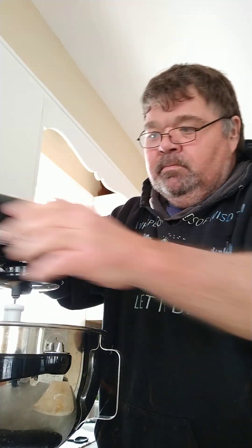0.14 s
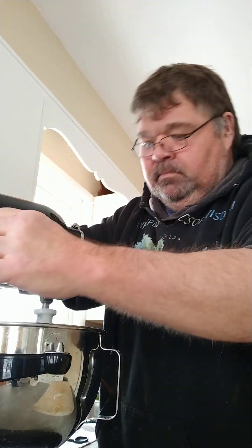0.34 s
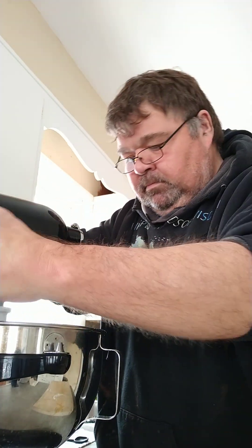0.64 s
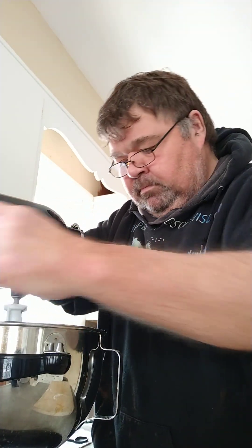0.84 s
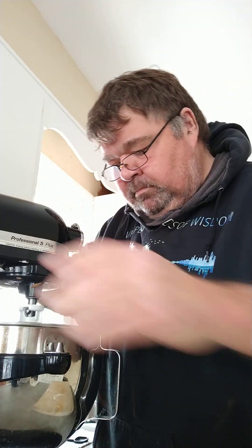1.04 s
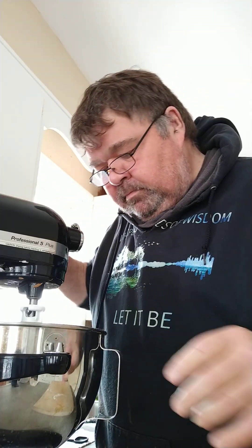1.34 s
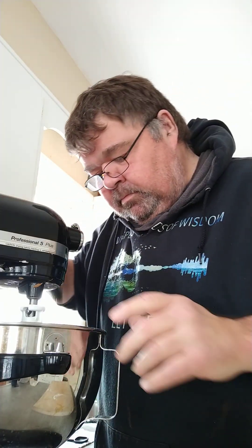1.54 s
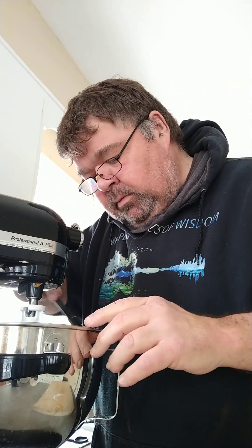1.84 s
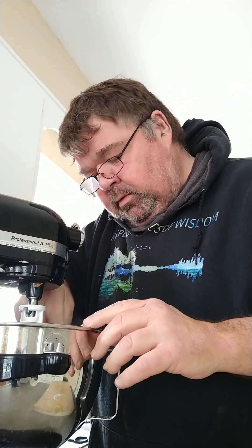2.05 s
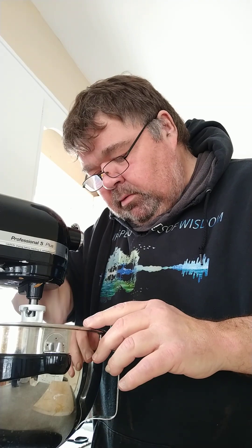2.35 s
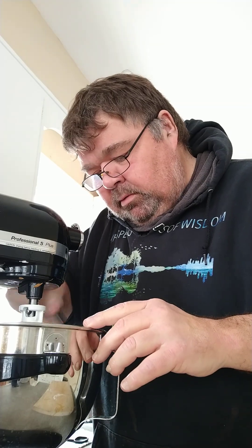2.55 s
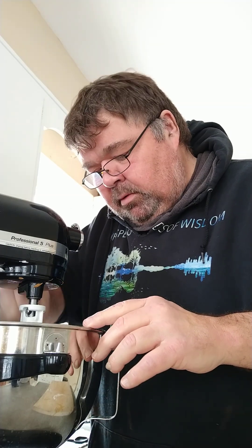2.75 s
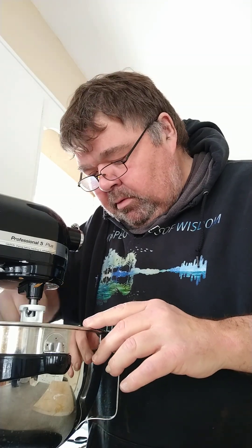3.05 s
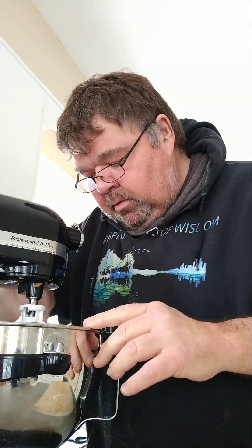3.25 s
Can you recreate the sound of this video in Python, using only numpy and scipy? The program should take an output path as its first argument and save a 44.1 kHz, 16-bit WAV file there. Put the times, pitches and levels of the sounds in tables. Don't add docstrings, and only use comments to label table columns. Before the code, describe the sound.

A stand mixer runs close by, its wavering mid-pitched gear whine mixed with high squeal, motor hum, brush hiss and low dough thuds. At 0.7 s a sharp switch snap cuts power; the whine slides down and dies by about 1.1 s, the noise by 1.3 s. Quiet room air and faint fridge hum remain, with a soft knock at 1.9 s, light hand rubs from 2.0 s, and small steel bowl taps from 2.8 to 3.35 s.

```python
import sys
import numpy as np
from scipy import signal
from scipy.fft import rfft, irfft, next_fast_len
from scipy.io import wavfile
from scipy.ndimage import uniform_filter1d

SR = 44100
rng = np.random.default_rng(int(sys.argv[2]) if len(sys.argv) > 2 else 0)


def voltage_ratio(decibels):
    exponent = np.asarray(decibels, float) / 20
    return 10 ** exponent


def to_wav(s):
    ch = np.atleast_2d(s).T
    pcm = np.round(np.clip(ch, -1, 1) * 32767)
    wavfile.write(sys.argv[1], SR, pcm.astype(np.int16))


N = 149940
TIME_S = np.arange(N) / SR
BIN_HZ = np.arange(N // 2 + 1) * SR / N
OFF_S = 0.7035


def rms_one(x):
    return x / np.sqrt(np.mean(x ** 2) + 1e-20)


def in_time(rows):
    s, *columns = np.transpose(rows)
    return [np.interp(TIME_S, s, column) for column in columns]


def at_hz(points, hz):
    point_hz, value = np.array(points).T
    return np.interp(np.log(hz + 1), np.log(point_hz), value)


def drift(rate_hz):
    r = np.exp(-40 * np.pi * rate_hz / SR)
    slow = signal.lfilter([1], [1, -2 * r, r * r], rng.standard_normal(N // 20 + 2002))[2000:]
    return np.interp(np.arange(N) / 20, np.arange(len(slow)), rms_one(slow))


def sine(hz):
    return np.sqrt(2) * np.sin(2 * np.pi * np.cumsum(hz + np.zeros(N)) / SR)


def ring(clicks, hz, t60):
    r, w = voltage_ratio(-60 / (t60 * SR)), 2 * np.pi * hz / SR
    return signal.lfilter([0, np.sin(w)], [1, -2 * r * np.cos(w), r * r], clicks + 1e-18)


# pitch_hz, likeness [0 to 1]
LIKENESS = [(200, 0.99), (500, 0.97), (1200, 0), (15000, 0.15)]
# pitch_hz, left_minus_right_db
NEAR_SIDE = [(60, -7), (150, 0.5), (380, -5.5), (950, -6), (2380, 1.5), (5980, -1.5), (15000, -19)]
FAR_SIDE = [(60, 4), (380, -4), (2380, 0.5), (15000, -7.5)]


def ports(x, side, diffuse=None, lagged=True):
    lag_s = 0.00014 * lagged
    half = voltage_ratio(at_hz(side, BIN_HZ) / 2) * np.exp(-1j * np.pi * BIN_HZ * lag_s)
    shared, unlike = rfft(x), 0
    if diffuse is not None:
        alike = np.clip(at_hz(LIKENESS, BIN_HZ), 0, 1)
        shared = np.sqrt(1 + alike) * shared
        unlike = np.sqrt(1 - alike) * rfft(diffuse)
    out = irfft([(shared + unlike) * half, (shared - unlike) / half], N)
    return out / np.sqrt(np.mean(out.mean(0) ** 2) / np.mean(x ** 2))


def noise(spectrum, side):
    inside = (BIN_HZ > spectrum[0][0]) * (BIN_HZ < spectrum[-1][0])
    shape = voltage_ratio(at_hz(spectrum, BIN_HZ)) * inside
    mid, other = irfft(shape * rfft(rng.standard_normal((2, N))), N)
    return ports(mid, side, other) / np.std(mid)


def band(hz, width_hz):
    sos = signal.butter(2, [hz - width_hz / 2, hz + width_hz / 2], "band", fs=SR, output="sos")
    return rms_one(signal.sosfilt(sos, rng.standard_normal(N)))


def stroke(start, rise, hold, fall, db):
    corners_s = np.cumsum([start, rise, hold, fall])
    return voltage_ratio(np.interp(TIME_S, corners_s, [db - 14, db, db, db - 33], left=-150, right=-150))


# time_s, pitch_hz, level_db, second_partial_db
MESH = [(0, 942, -37.5, -41), (.02, 959.5, -27.5, -50), (.09, 947.4, -40, -42.5), (.135, 991.4, -26, -40.5),
        (.165, 968, -33.5, -44), (.216, 984, -30, -40.5), (.262, 949, -30.5, -40.5),
        (.3, 976.6, -37, -43.5), (.385, 944, -29.5, -41), (.43, 900, -27.5, -39),
        (.47, 906.6, -28.5, -47.5), (.5, 905, -34.5, -37.5), (.53, 906.1, -27.5, -40),
        (.585, 897.7, -31, -33), (.606, 880, -39.5, -39), (.63, 882, -23, -34.5), (.658, 905, -41, -42.5),
        (.685, 914.7, -38.5, -33.5)]
COAST = [(.72, 931.4, -31.5, -36), (.746, 893.6, -30.5, -44.5), (.795, 788, -28.5, -42),
         (.843, 668, -32, -34.5), (.87, 652.7, -31.5, -47.5), (.896, 596.2, -32, -49),
         (.922, 556.4, -23.5, -41.5), (.946, 521.2, -41, -40.5), (1.004, 426.7, -30, -45),
         (1.033, 389, -37, -50.5), (1.06, 314.2, -57.5, -48.5), (1.11, 290.2, -59.5, -44.5)]


def gear_whine(mesh_turn):
    _, db, second_db = in_time(MESH + COAST)
    shaft_turn = mesh_turn / 9.3
    wobble = 2 * voltage_ratio(-15 + 2.6 * drift(9.2)) * np.cos(shaft_turn + 0.8 * drift(22))
    rough = 1 + voltage_ratio(-11.5) * drift(90) + wobble
    flutter_db = 2.15
    first = voltage_ratio(db + flutter_db * drift(17)) * np.sin(mesh_turn)
    upper = np.sin(2 * mesh_turn) + voltage_ratio(-17.5) * np.sin(3 * mesh_turn)
    return np.sqrt(2) * rough * (first + voltage_ratio(second_db + flutter_db * drift(30)) * upper)


# time_s, level_db
SQUEAL = [(0, -52), (.07, -41), (.13, -41.5), (.21, -38), (.26, -41), (.33, -42.5), (.39, -45),
          (.43, -38.5), (.5, -40), (.58, -40.5), (.62, -46.5), (.68, -39.5), (.73, -32.5), (.8, -47),
          (.86, -47.5), (.95, -55.5), (1.05, -69.5)]
# pitch_hz, level_db
SQUEAL_BODY = [(7300, -29), (8300, -17.5), (9500, -13), (10750, -6), (11650, 2), (12500, -7),
               (13300, -28.5)]


def housing_squeal(mesh_hz):
    off = TIME_S > OFF_S
    jitter = np.where(off, 0.04, 0.0055)
    shaky_hz = mesh_hz * (1 + jitter * drift(160))
    partials = 0
    for k in range(9, 19):
        hz = k * mesh_hz
        dulling_db = off * -22 * np.log2(hz / 9800)
        level_db = at_hz(SQUEAL_BODY, hz) + dulling_db + 3 * drift(48)
        partials = partials + voltage_ratio(level_db) * sine(k * shaky_hz)
    return voltage_ratio(in_time(SQUEAL)[0]) * partials


# pitch_hz, level_db
MOTOR_HUM = [(183.0, -52.5), (242.2, -50), (290.7, -48), (360.7, -42.5), (414.5, -46.5)]


def motor_hum():
    hum = 0
    for hz, db in MOTOR_HUM:
        wave = np.sin(2 * np.pi * hz * TIME_S + 0.87 * drift(16))
        hum = hum + np.sqrt(2) * voltage_ratio(db + 2.5 * drift(37)) * wave
    return hum * np.exp(-np.maximum(TIME_S - OFF_S, 0) / 0.045)


# pitch_hz, width_hz, level_db
CASE = [(554, 31, -48), (857, 43, -44), (1415, 60, -50), (1610, 40, -50), (2051, 60, -52.5),
        (5610, 200, -54.5)]


def housing_resonance(swing_db, power):
    total = 0
    for hz, width_hz, db in CASE:
        loss_db = 9 * (1 - power) * (hz < 1000)
        total = total + voltage_ratio(db - loss_db) * band(hz, width_hz)
    return voltage_ratio(0.6 * swing_db) * total


RUMBLE = [(24, -42.5), (40, -14.5), (200, -9.5), (354, -6.5), (683, -10), (916, -10), (2500, -22.5),
          (3250, -55.5), (5500, -120)]
GRIND = [(900, -3.5), (1600, -1.5), (2500, -2.5), (3300, -8), (4500, -5), (5800, -4.5), (7300, -14.5),
         (8000, -14)]
HISS = [(7300, -14.5), (8200, -0.5), (10500, 3.5), (13000, 0), (16000, -20.5)]
HISS_SLOW = [(7300, -5.5), (8200, 7.5), (9700, 5), (11800, -3), (13000, -8.5), (16000, -23.5)]


def motor_noise(effort_db, swing_db, power, mesh_turn):
    tooth_pulse = 1 + 0.069 * np.cos(mesh_turn)
    rumble_db = effort_db[0] + 7.5 + 0.5 * swing_db - 10.5 * (1.5 - power) + 2.8 * drift(11)
    grind_db = effort_db + 1.1 * drift(45)
    hiss_db = effort_db[0] + 1 + 2.12 * swing_db + 2 * (1 - power) + 1.2 * drift(26)
    fast = power * noise(HISS, NEAR_SIDE)
    slow = (1 - power) * voltage_ratio(5.5) * noise(HISS_SLOW, NEAR_SIDE)
    rumble = voltage_ratio(rumble_db) * noise(RUMBLE, NEAR_SIDE)
    grind = voltage_ratio(grind_db) * tooth_pulse * noise(GRIND, NEAR_SIDE)
    return rumble + grind + voltage_ratio(hiss_db) * tooth_pulse * (fast + slow)


# time_s, level_db
EFFORT = [(0, -40), (.69, -41.5), (.73, -38.5), (.9, -43), (1.0, -46), (1.08, -49.5), (1.2, -59),
          (1.26, -76)]


def motor():
    mesh_hz = in_time(MESH + COAST)[0]
    mesh_turn = 2 * np.pi * np.cumsum(mesh_hz * (1 + 0.005 * drift(36.2))) / SR
    power = np.exp(-np.maximum(TIME_S - OFF_S, 0) / 0.21)
    effort_db, = in_time(EFFORT)
    swing_db = effort_db - effort_db[0]
    gears_turn = np.clip((1.14 - TIME_S) / 0.07, 0, 1)
    noise_lives = np.clip((1.33 - TIME_S) / 0.0407, 0, 1)
    tones = gears_turn * (gear_whine(mesh_turn) + housing_squeal(mesh_hz)) + motor_hum()
    tones = tones + noise_lives * housing_resonance(swing_db, power)
    return tones, noise_lives * motor_noise(effort_db, swing_db, power, mesh_turn)


# pitch_hz, level_db [per Hz]
ROOM_LOW = [(18, -52), (30, -44.5), (118, -10), (204, -9), (289, -9.5), (383, -10), (2000, -27.5),
            (2600, -63), (4400, -120)]
ROOM_HIGH = [(2000, -5.5), (3500, -3), (4800, -5.5), (5900, -3), (7200, -12.5), (10500, -6.5),
             (16000, -15.5)]
# pitch_hz, level_db
FRIDGE = [(59.2, -79), (118.4, -69), (285.3, -78.5), (452.2, -71), (705.2, -74.5), (1943, -85.5)]
# time_s, pitch_hz, level_db
WHISTLE = [(1.33, 12600, -92), (1.44, 15100, -83), (1.58, 13400, -85), (1.72, 12600, -92)]


def room_tone():
    lines = np.zeros(N)
    for hz, db in FRIDGE:
        wave = np.sin(2 * np.pi * hz * TIME_S + rng.uniform(0, 6.55))
        lines += np.sqrt(2) * voltage_ratio(db + 3.5 * drift(7.2)) * wave
    hz, db = in_time(WHISTLE)
    sounding = (TIME_S > WHISTLE[0][0]) * (TIME_S < WHISTLE[-1][0])
    lines += sounding * voltage_ratio(db) * sine(hz) / np.sqrt(2)
    low = voltage_ratio(-63 + 0.47 * drift(2.5)) * noise(ROOM_LOW, FAR_SIDE)
    high = voltage_ratio(-74) * noise(ROOM_HIGH, FAR_SIDE)
    return low + high + ports(lines, FAR_SIDE)


def kitchen(x):
    t60_s, wall_cut_hz = 0.44, 6800
    size = next_fast_len(N + SR)
    hz = np.arange(size // 2 + 1) * SR / size
    spectrum, out = rfft(x, size), np.zeros((2, N))
    for k, lag_s in enumerate(rng.uniform(0.011, 0.04, 16)):
        bounce = voltage_ratio(-60 * lag_s / t60_s) / (1 + 1j * hz / wall_cut_hz)
        loop = bounce * np.exp(-2j * np.pi * hz * lag_s)
        echoes = irfft(spectrum * loop / (1 - loop), size)[:N]
        out[k % 2] += echoes * (-1) ** (k // 2)
    return out


# time_s, level_db
THUDS = [
    (0.029, -46),
    (0.139, -43),
    (.235, -36),
    (0.359, -42),
    (.585, -41),
    (.69, -43.5),
    (1.915, -52.5),
    (2.83, -56),
]


def thuds():
    s, db = np.transpose(THUDS)
    push = np.zeros(N)
    push[(s * SR).astype(int)] = voltage_ratio(db)
    return ring(uniform_filter1d(push, size=220), 72, 0.23)


# pitch_hz, level_db, t60_s
SNAP = [(10110, 3, 0.0059), (12500, -0.5, 0.0025), (15300, -4.5, 0.0026), (8160, -6.5, .005),
        (5680, -15, 0.041)]
# pitch_hz, level_db [per Hz]
TICK = [(3000, 0.5), (5200, 7.5), (6500, -11), (10000, 7.5), (16000, -12)]


def switch():
    after_s, click = TIME_S - OFF_S, np.zeros(N)
    click[int(OFF_S * SR)] = voltage_ratio(-8)
    fade = (after_s > 0) * np.exp(-np.abs(after_s) / 0.041)
    rattle = voltage_ratio(-33.5) * fade * noise(TICK, NEAR_SIDE)
    crack = sum(voltage_ratio(db) * ring(click, hz, t60) for hz, db, t60 in SNAP)
    return signal.sosfilt(signal.butter(4, 4800, "high", fs=SR, output="sos"), crack), rattle


# start_s, rise_s, hold_s, fall_s, level_db
RUBS = [
    (2.029, 0.061, 0.067, 0.17, -63.5),
    (2.261, 0.019, 0.031, 0.025, -79.5),
    (2.409, .02, 0.09, 0.092, -67.5),
    (2.686, 0.067, 0.094, .05, -63),
    (2.856, 0.024, 0.084, 0.1, -65.5),
    (3.014, 0.043, 0.12, 0.02, -68),
    (3.304, 0.059, .06, .05, -62),
    (1.275, 0.0091, .02, .08, -65.5),
]
# pitch_hz, level_db [per Hz]
RUB = [(2500, -11), (4500, -8.5), (6700, -5), (10500, -2), (16000, -7)]
# time_s, peak_db, t60_s
TICKS = [
    (1.2699, -42.5, 0.04),
    (2.027, -44.5, 0.012),
    (2.8596, -43.5, 0.016),
    (2.8888, -47, 0.05),
    (2.9317, -47.5, 0.06),
]
# start_s, rise_s, hold_s, fall_s, level_db
SLIDE = (2.4, .03, .8, .08, -73)


def hands():
    rubs = sum(stroke(*row) for row in RUBS) * voltage_ratio(1.6 * drift(40)) * noise(RUB, FAR_SIDE)
    bursts = 0
    for s, db, t60 in TICKS:
        bursts = bursts + (TIME_S > s) * voltage_ratio(db - 6.5 - 60 * np.abs(TIME_S - s) / t60)
    press_db = 3.3 * np.exp(-((TIME_S - 2.9) / 0.047) ** 2)
    slide = stroke(*SLIDE) * voltage_ratio(1.2 * drift(25) + press_db) * band(10300, 990)
    return rubs + bursts * noise(TICK, NEAR_SIDE) + ports(slide, NEAR_SIDE)


# time_s, peak_db, brightness_db [per octave], favoured_hz
TAPS = [(1.888, -43.5, -0.5, 170), (2.8031, -43.5, 3, 1376), (2.8085, -48.5, 4, 1376),
        (2.82, -61, -1, 1376), (2.86, -57.5, 2.5, 1376), (2.875, -60, 3.5, 1056), (2.89, -50, 2, 523),
        (2.905, -70, 8.5, 1376), (2.944, -49.5, -0.5, 200), (3.108, -47.5, -6, 400),
        (3.112, -57, -2.5, 520), (3.148, -57.5, -3, 500), (3.177, -70, -9.5, 490), (3.197, -68.5, -3, 500),
        (3.304, -51.5, -1.5, 498), (3.312, -49, -6, 170.3), (3.343, -63, 1.5, 400),
        (3.356, -54.5, -4.5, 202)]
# pitch_hz, level_db, t60_s
BOWL = [(171.2, 0, 0.057), (71.7, -23, 0.075), (363, -2, 0.029), (523, 3, 0.043), (829.5, -1, 0.028),
        (1056, -3.5, 0.032), (1376, -5, 0.033), (1800, -8, 0.0062), (2490, -7.5, 0.00513),
        (2940, -11.5, 0.00703), (3780, -17, 0.00596)]
# time_s, pitch_hz, level_db, t60_s
PING = (2.052, 4648, -62, 0.03)


def taps():
    start_s, peak_db, bright_db, favoured_hz = np.array(TAPS).T
    blows = np.zeros((len(TAPS), N))
    blows[np.arange(len(TAPS)), (start_s * SR).astype(int)] = 1
    spread_db = rng.normal(0, 1.5, (len(TAPS), len(BOWL)))
    grit = rng.standard_normal(N)
    force = []
    for s in start_s:
        away_s = np.abs(TIME_S - s)
        fade = np.exp(-away_s / 0.0096) + voltage_ratio(-14.5) * np.exp(-away_s / 0.045)
        force.append((TIME_S > s) * fade)
    ping_s, ping_hz, ping_db, ping_t60 = PING
    nail = np.zeros(N)
    nail[int(ping_s * SR)] = 1
    out = voltage_ratio(ping_db) * ring(nail, ping_hz, ping_t60)
    for k, (hz, db, t60) in enumerate(BOWL):
        favour_db = 3.5 * np.exp(-(np.log2(hz / favoured_hz) / 0.6) ** 2)
        tilt_db = bright_db * np.log2(hz / 400)
        gain = voltage_ratio(peak_db + db - 4 + tilt_db + spread_db[:, k] + favour_db)
        scuff = voltage_ratio(-25.5) * np.roll(grit, k * 999) * (gain @ force)
        struck = ring((-1) ** k * gain @ blows + scuff, hz, t60)
        r, w = np.exp(-hz / SR / 0.54), 2 * np.pi * hz / SR
        out = out + signal.lfilter([2 * (1 - r) * np.sin(w)], [1, -2 * r * np.cos(w), r * r], struck)
    return out


def scene():
    tones, noises = motor()
    snap, rattle = switch()
    mixer, knocks = tones + snap + thuds(), taps()
    direct = ports(mixer, NEAR_SIDE) + ports(knocks, FAR_SIDE, lagged=False)
    echoes = voltage_ratio(-15.5) * kitchen(mixer + voltage_ratio(2.0) * knocks)
    return direct + echoes + noises + rattle + hands() + room_tone()


def low_pass(x):
    return signal.sosfilt(signal.butter(12, 15950, fs=SR, output="sos"), x)


def record(dry):
    thin = signal.sosfilt(signal.butter(3, 55, "high", fs=SR, output="sos"), dry)
    return low_pass(np.clip(thin, -1, 1))


dry = scene()
out = record(dry)
to_wav(out)
```